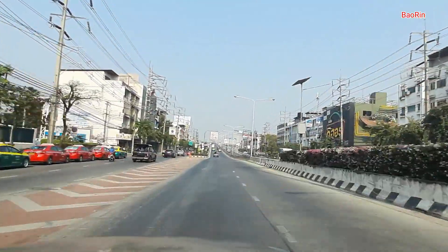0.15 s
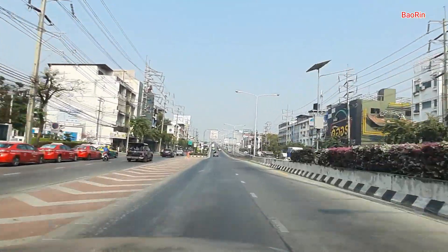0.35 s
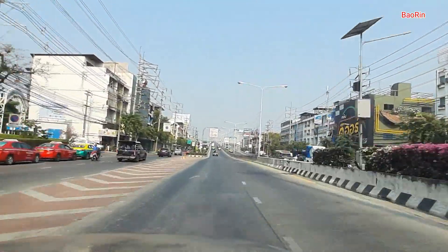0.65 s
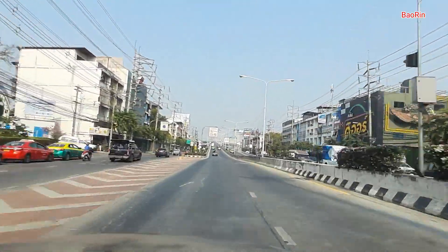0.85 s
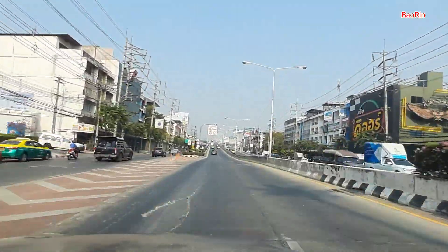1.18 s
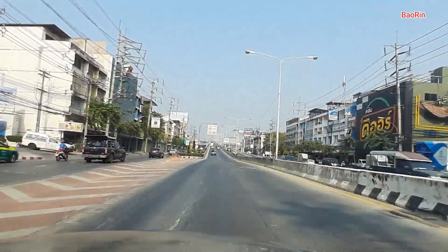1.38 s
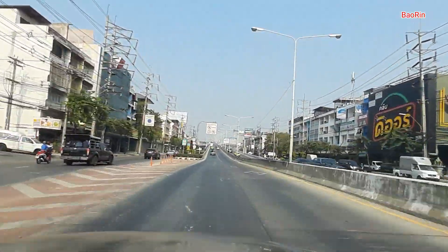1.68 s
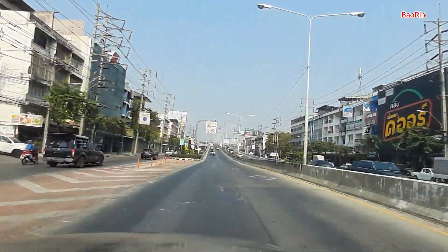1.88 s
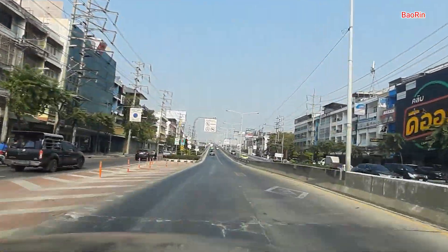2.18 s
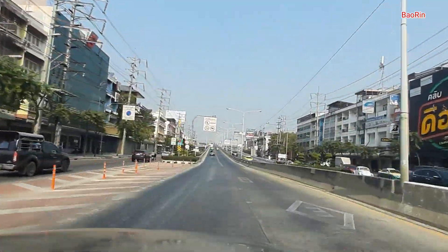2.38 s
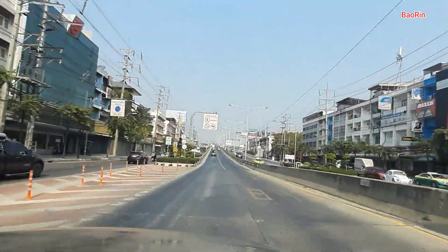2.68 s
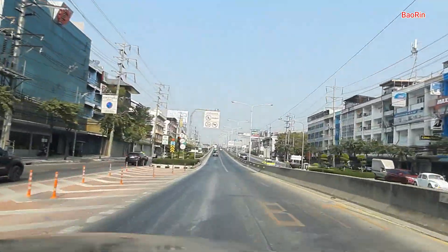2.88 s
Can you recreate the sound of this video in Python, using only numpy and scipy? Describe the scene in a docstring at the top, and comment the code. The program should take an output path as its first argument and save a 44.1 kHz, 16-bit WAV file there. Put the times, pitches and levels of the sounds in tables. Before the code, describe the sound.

Tyres and engine rumble inside a moving car as seams thud and loose plastic rattles

```python
"""Inside a car on a worn concrete road: three seconds of filtered noise, sine waves and short blows.
From the start the engine drones (sines), the tyres roar (noise), trim ticks and chatters, and seams knock.
At about 1.5 s a short uneven stretch swells the rumble and the cabin booms; soon a small hard part clinks.
From about 2.3 s a longer uneven stretch brings more rumble, booms, knocks and rattling trim.
It eases towards the end, where the small part clinks once more."""
import sys
import numpy as np
from scipy import signal
from scipy.fft import rfft, irfft, next_fast_len
from scipy.io import wavfile

SR = 44100
rng = np.random.default_rng(int(sys.argv[2]) if len(sys.argv) > 2 else 0)


def generate_wav(sig):
    """Save sig (samples, or channels by samples) to the path in sys.argv[1] as 16-bit PCM at SR."""
    pcm = np.round(np.clip(np.atleast_2d(sig).T, -1, 1) * 32767).astype(np.int16)
    wavfile.write(sys.argv[1], SR, pcm)


N = 134505
T = np.arange(N) / SR  # time of each sample, s

# Engine: average firing rate, its relative wander, and the waver of each line
FIRING_HZ, SPEED_WANDER, ENGINE_WAVER_DB = 71.32, 0.0061, 0.5
# engine lines: multiple of the firing rate, level/dB
ENGINE_LINES = [(1, -2), (2, -10), (3, -32), (4, -23.5)]
# strength of the drone: t/s, level/dB
DRONE_LEVEL = [(0, -60), (.13, -27), (.37, -33.5), (.45, -26.5), (.6, -30), (.82, -33), (1.0, -35),
               (1.15, -29), (1.38, -26.5), (1.46, -35), (1.58, -31), (1.63, -25.5), (1.68, -30),
               (1.8, -31.5), (1.88, -30), (2.06, -34), (2.3, -32), (2.92, -47.5), (3.05, -28)]

# deep shake of the body on its springs: t/s, level/dB; then its colour: f/Hz, level/dB
SHAKE_LEVEL = [(0, -46), (.15, -39.5), (.6, -48), (1.08, -53), (1.36, -42.5), (1.8, -42), (2.27, -60.5),
               (2.66, -32), (2.85, -42), (3.05, -48)]
SHAKE_COLOUR = [(15, -34), (26, -14), (34, 3.5), (46, -2.5), (70, -19.5), (300, -78), (2000, -120)]

# colour of the steady tyre roar heard through the body: f/Hz, level/dB
ROAR_COLOUR = [(18, -32), (35, -15), (54, 2), (90, 4), (170, 0.5), (225, -10.5), (380, -14.5), (480, -12.5),
               (600, -16.5), (800, -21.5), (980, -19.5), (1080, -22), (1430, -41), (1800, -36.5),
               (2400, -51.5), (4200, -53), (5400, -65.5), (6200, -69), (7700, -70.5), (8400, -72.5),
               (11000, -67.5), (13000, -80.5)]
ROAR_DB, ROAR_FLUTTER_DB = -34, 2.5
# body panels and tread band ringing: f/Hz, width/Hz, level/dB
ROAD_RESONANCES = [(57.5, 11, -42), (142.4, 16, -43.5), (248.8, 2, -49), (266.6, 7.6, -49), (319.2, 6, -51),
                   (338.1, 11, -50.5), (409.5, 5.8, -48), (447.8, 22, -47), (774.5, 22, -56.5),
                   (873.4, 17, -54.5), (947, 7.6, -55.5), (1282, 13, -65.5), (1355, 63, -58.5)]
RING_SWAY_DB, RING_SWAY_HZ = 1.9, 1.93
# hum of the air inside the tyres: t/s, level/dB
TYRE_AIR_LEVEL = [(0, -47), (.2, -37), (.45, -41), (.65, -43.5), (1.3, -45), (1.6, -36.5), (2.0, -44.5),
                  (2.3, -47.5), (2.55, -34.5), (2.9, -39), (3.05, -44)]
TYRE_AIR_HZ, TYRE_AIR_WIDTH_HZ = 194.3, 7.8
# hiss of the tread: t/s, level/dB; then its colour: f/Hz, level/dB
TREAD_LEVEL = [(0, -45.5), (.33, -51.5), (.4, -61), (.47, -52), (.54, -43), (.6, -52), (.7, -47),
               (.9, -48.5), (1.2, -48.5), (1.33, -49), (1.7, -51.5), (1.95, -50.5), (2.05, -47),
               (2.35, -46), (2.52, -48.5), (2.64, -51), (2.74, -50), (2.94, -49.5), (3.05, -91)]
TREAD_COLOUR = [(300, -15), (650, 6.5), (900, 9), (1150, 2), (1400, -4.5), (1850, -15.5), (2400, -24),
                (3200, -39), (12000, -76)]
# brighter hiss of the tread: t/s, level/dB; then its colour: f/Hz, level/dB
SIZZLE_LEVEL = [(0, -64), (.3, -57), (.42, -53), (.66, -51.5), (.85, -63), (1.0, -61), (1.2, -53.5),
                (1.4, -69), (1.97, -61), (2.03, -55), (2.1, -67), (2.45, -66), (2.66, -48), (2.75, -51),
                (3.05, -61)]
SIZZLE_COLOUR = [(600, -25.5), (1050, -4), (1380, 5.5), (1550, -5), (1850, -10.5), (2400, -27),
                 (6000, -62.5)]
# extra rumble on uneven road: t/s, level/dB; then its colour: f/Hz, level/dB
RUMBLE_LEVEL = [(0, -37), (.55, -38.5), (.85, -60), (1.45, -36), (1.505, -26), (1.56, -39), (1.75, -33),
                (1.85, -45.5), (2.3, -38), (2.41, -27), (2.47, -27.5), (2.57, -21.5), (2.66, -27),
                (2.84, -30), (2.98, -43.5), (3.05, -59)]
RUMBLE_COLOUR = [(18, -29), (32, -2.5), (60, 4.5), (105, 5.5), (185, 1.5), (280, -4.5), (350, -8.5),
                 (510, -8), (620, -14), (900, -22.5), (1500, -31), (2400, -49), (6000, -74.5),
                 (14000, -110)]

# chatter of loose trim: t/s, level/dB
CHATTER_LEVEL = [(0, -67.5), (.2, -72), (.48, -74), (.55, -70.5), (.85, -76), (1.2, -74), (1.33, -68.5),
                 (1.44, -73), (1.56, -61.5), (1.66, -71.5), (1.82, -69.5), (1.9, -78), (2.35, -75),
                 (2.49, -57.5), (2.555, -61), (2.61, -54), (2.69, -57), (2.75, -61), (2.83, -60.5),
                 (2.9, -67.5), (3.0, -76), (3.05, -60.5)]
CHATTER_PER_S, CHATTER_SPREAD_DB, CHATTER_T60_S = 1000, 3, 0.045
# broad colour of the plastic trim: f/Hz, level/dB
TRIM_COLOUR = [(1200, -25), (2100, -2), (2600, -4.5), (3200, 3), (4000, 0), (5500, -3), (6500, -11),
               (7700, -10), (8400, -13), (11300, -16), (12800, -27), (16000, -43.5)]
# the trim's own resonances: f/Hz, width/Hz, level/dB relative to the broad colour
TRIM_MODES = [(3110, 64, -11), (3610, 16, -27.5), (3550, 23, -27.5), (3820, 22, -20.5), (4070, 65, -13),
              (4740, 33, -13.5), (4800, 15, -27.5), (5050, 25, -21.5), (5340, 19, -18.5), (5880, 15, -18.5),
              (6100, 15, -22.5)]

# fine gritty rattle: t/s, level/dB; then its colour: f/Hz, level/dB
GRIT_LEVEL = [(0, -84), (.1, -82), (.2, -85.5), (1.25, -86), (1.33, -85), (1.41, -91), (1.49, -69),
              (1.57, -80), (1.64, -83.5), (2.32, -90), (2.42, -78), (2.5, -66.5), (2.56, -66),
              (2.63, -62.5), (2.72, -68), (2.87, -78), (3.0, -78)]
GRIT_COLOUR = [(2000, -15.5), (3300, -1.5), (5500, 4.5), (7600, 4), (8800, -12), (11500, -10), (13500, -21),
               (16000, -30.5)]
GRIT_PER_S, GRIT_SPREAD_DB, GRIT_T60_S = 330, 3.2, .011

# loose trim ticks: t/s, crack level/dB, ring level/dB, ring f/Hz, ring width/Hz
TICKS = [(.006, -62, -73, 4500, 1100), (.044, -71, -73, 5000, 1100), (.084, -66, -67, 3770, 600),
         (0.113, -62, -61.5, 3220, 407), (0.355, -57, -58.5, 4240, 1400), (0.636, -54, -57.5, 4160, 1100),
         (.644, -62, -60.5, 5130, 1100), (.668, -70, -67, 3800, 900), (.682, -72, -66, 4420, 900),
         (.995, -56, -65, 4430, 900), (1.231, -66, -60, 3660, 248), (1.322, -70, -76, 5600, 1400),
         (1.536, -62, -59, 4700, 900), (1.574, -57, -56.5, 4150, 890), (1.663, -77, -75.5, 11500, 1100),
         (1.711, -59.5, -61.5, 3720, 250), (2.286, -64, -75, 7000, 1100), (2.417, -69, -65, 4500, 1100),
         (2.473, -54, -53.5, 4000, 1100), (2.488, -53, -59, 6270, 1400), (2.583, -59, -57, 4700, 1100),
         (2.632, -53, -58, 3600, 1100), (2.661, -58, -64, 3270, 1100), (2.678, -60, -61, 4670, 1100),
         (2.689, -64, -72, 11000, 1400), (2.772, -50, -63, 4400, 1400), (2.811, -48.5, -56, 5570, 1400)]
# colour of the crack: f/Hz, level/dB
TICK_COLOUR = [(1200, -3), (2600, -0.5), (3300, -2.5), (5500, -7), (7500, -6.5), (8500, -10.5),
               (11000, -14), (13000, -23.5), (16000, -32)]
TICK_ATTACK_S, TICK_T60_S, TICK_RING_T60_S = 0.0007, 0.04, 0.13

# a wheel hits a seam: t/s, thud level/dB, thud f/Hz, tread slap level/dB
SEAMS = [(0.018, -33.5, 260, -46), (.125, -36, 160, -45.5), (0.355, -36, 350, -32.5),
         (0.523, -31, 220, -44.5), (0.63, -45, 300, -47), (1.477, -28.5, 171, -45), (1.496, -21, 290, -48),
         (1.675, -29.5, 364, -60), (2.177, -24.5, 196, -43), (2.341, -30.5, 390, -59),
         (2.412, -38, 400, -51), (2.492, -27, 200, -39), (2.528, -27.5, 286, -57), (2.583, -23.5, 259, -37),
         (2.62, -31.5, 750, -46), (2.656, -32, 400, -39.5), (2.715, -29, 344, -48), (2.769, -43, 380, -43)]
# colour of a thud: multiple of its pitch, level/dB
THUD_SHAPE = [(.2, -17), (.6, -7), (1, 5), (1.35, -4.5), (2.2, -25.5), (5, -40), (30, -100)]
# colour of the tread's slap: f/Hz, level/dB
SLAP_COLOUR = [(200, -2), (500, 4.5), (750, -2.5), (1000, 0), (1350, -5.5), (1900, -16), (2600, -34),
               (6000, -55.5), (14000, -90.5)]
SEAM_ATTACK_S, THUD_T60_S, SLAP_T60_S = .009, 0.11, 0.24

# the body heaves and the cabin booms: crest t/s, level/dB, half length/s, f/Hz
BOOMS = [(1.508, -24, 0.012, 113), (1.534, -24.5, 0.014, 61), (1.705, -28, .022, 102.5),
         (1.727, -23, 0.022, 66), (2.391, -29, 0.017, 116), (2.437, -19, 0.011, 79), (2.54, -21, 0.026, 72),
         (2.595, -22.5, 0.0098, 90), (2.767, -21.5, .016, 72), (2.823, -21, 0.018, 75.6)]

# a small hard part clinks: t/s, level/dB
CLINKS = [(1.758, -57), (3.022, -60)]
# how that part rings: f/Hz, level/dB relative to the clink, time to fall by 60 dB/s
CLINK_MODES = [(2920, -2.5, 0.055), (3300, 1.5, 0.024), (3600, -12, .05)]

HISS_DB, CUTOFF_HZ, FADE_S = -83, 15450, .004


def from_db(db):
    """Turn decibels into a plain multiplier."""
    return 10 ** (np.asarray(db) / 20)


def rms_one(x):
    """Scale a sound to an average power of one."""
    return x / np.sqrt(np.mean(x ** 2) + 1e-20)


def level(curve):
    """Multiplier over time, from rows of t/s, level/dB."""
    return from_db(np.interp(T, *np.transpose(curve)))


def noise(colour):
    """Noise of unit power, its frequencies weighted by rows of f/Hz, level/dB."""
    hz, db = np.transpose(colour)
    size = next_fast_len(N)
    f = np.maximum(np.fft.rfftfreq(size, 1 / SR), 1)
    gain = from_db(np.interp(np.log(f), np.log(hz), db))
    white = rng.standard_normal(size)
    return rms_one(irfft(rfft(white) * gain, size)[:N])


def drift(rate):
    """Random wander of spread 1, with changes mostly slower than rate (Hz)."""
    step = 40  # make one wander value for every 40 samples, then join them up
    r = np.exp(-2 * np.pi * rate * step / SR)
    steps = rng.standard_normal(N // step + 2002)
    slow = signal.lfilter([1], [1, -2 * r, r * r], steps)[2000:]  # drop the filter's start-up
    return np.interp(np.arange(N) / step, np.arange(len(slow)), rms_one(slow - slow.mean()))


def resonance(hz, width):
    """Noise of unit power ringing at one pitch; a smaller width rings longer."""
    r = np.exp(-np.pi * width / SR)
    poles = [1, -2 * r * np.cos(2 * np.pi * hz / SR), r * r]
    rung = signal.lfilter([1, 0, -1], poles, rng.standard_normal(N + SR))
    # keep about half an octave either side of the pitch
    skirts = signal.butter(2, [hz / np.sqrt(2), hz * np.sqrt(2)], "band", fs=SR, output="sos")
    return rms_one(signal.sosfilt(skirts, rung)[SR:])  # drop the first second of settling


def blow(start, attack, t60):
    """Loudness of a blow: a quick rise, then a fall of 60 dB in every t60 seconds."""
    rise = np.clip((T - start) / attack, 0, 1)
    fall = 1e3 ** (-np.clip((T - start - attack) / t60, 0, 4))
    return rise * fall


def patter(per_s, spread_db, t60):
    """Loudness of many tiny random contacts of uneven size, each dying away; unit power."""
    sizes = from_db(spread_db * np.minimum(rng.exponential(1, N), 4))
    contacts = (rng.random(N) < per_s / SR) * sizes
    keep = np.exp(-2 * np.log(1000) / (t60 * SR))  # share of energy left after one sample
    energy = signal.lfilter([1], [1, -keep], contacts ** 2 + 1e-18)
    return rms_one(np.sqrt(energy))


def engine_turns():
    """Count of firing cycles so far, as the engine's speed wanders a little."""
    firing_hz = FIRING_HZ * (1 + SPEED_WANDER * drift(1.32))
    return np.cumsum(firing_hz) / SR + rng.random()


def engine(turns):
    """Drone of sine waves at whole multiples of the firing rate, each wavering a little."""
    lines = 0
    for multiple, db in ENGINE_LINES:
        strength = from_db(db + ENGINE_WAVER_DB * drift(5.8))
        lines = lines + strength * np.sin(2 * np.pi * round(multiple) * turns)
    return np.sqrt(2) * level(DRONE_LEVEL) * lines


def shake():
    """Deep noise of the body shaking on its springs."""
    return level(SHAKE_LEVEL) * noise(SHAKE_COLOUR)


def tyres():
    """Fluttering roar, swaying resonances, air hum and tread hiss, with rumble on uneven road."""
    roar = from_db(ROAR_DB + ROAR_FLUTTER_DB * drift(14)) * noise(ROAR_COLOUR)
    rings = 0
    for hz, width, db in ROAD_RESONANCES:
        strength = from_db(db + RING_SWAY_DB * drift(RING_SWAY_HZ))
        rings = rings + strength * resonance(hz, width)
    air_hum = level(TYRE_AIR_LEVEL) * resonance(TYRE_AIR_HZ, TYRE_AIR_WIDTH_HZ)
    tread = level(TREAD_LEVEL) * noise(TREAD_COLOUR)
    sizzle = level(SIZZLE_LEVEL) * noise(SIZZLE_COLOUR)
    rumble = level(RUMBLE_LEVEL) * noise(RUMBLE_COLOUR)
    return roar + rings + air_hum + tread + sizzle + rumble


def trim_noise():
    """Noise of unit power coloured like the plastic trim, with its own resonances."""
    modes = sum(from_db(db) * resonance(hz, width) for hz, width, db in TRIM_MODES)
    return rms_one(noise(TRIM_COLOUR) + modes)


def chatter():
    """Loose trim buzzes: a dense patter of contacts shapes the trim's noise."""
    contacts = patter(CHATTER_PER_S, CHATTER_SPREAD_DB, CHATTER_T60_S)
    return level(CHATTER_LEVEL) * contacts * trim_noise()


def grit():
    """Bright, very short grains of noise, strongest on the roughest patches."""
    return level(GRIT_LEVEL) * patter(GRIT_PER_S, GRIT_SPREAD_DB, GRIT_T60_S) * noise(GRIT_COLOUR)


def ticks():
    """Plastic contacts: a short broad crack, while the touched piece rings at its own pitch."""
    crack = noise(TICK_COLOUR)
    total = 0
    for start, crack_db, ring_db, hz, width in TICKS:
        total = total + from_db(crack_db) * crack * blow(start, TICK_ATTACK_S, TICK_T60_S)
        ring = resonance(hz, width) * blow(start, TICK_ATTACK_S, TICK_RING_T60_S)
        total = total + from_db(ring_db) * ring
    return total


def seams():
    """Each seam gives a noisy thud through the suspension and a slap of the tread."""
    slap = noise(SLAP_COLOUR)
    total = 0
    for start, thud_db, hz, slap_db in SEAMS:
        thud = noise([(multiple * hz, db) for multiple, db in THUD_SHAPE])
        total = total + from_db(thud_db) * thud * blow(start, SEAM_ATTACK_S, THUD_T60_S)
        total = total + from_db(slap_db) * slap * blow(start, SEAM_ATTACK_S, SLAP_T60_S)
    return total


def booms(turns):
    """Each heave briefly swells a low tone of the cabin air, in step with the drone at its crest."""
    total = 0
    for crest, db, half_length, hz in BOOMS:
        swell = np.exp(-.5 * ((T - crest) / half_length) ** 2)
        cycles = turns + (hz - FIRING_HZ) * (T - crest)
        total = total + from_db(db) * swell * np.sin(2 * np.pi * cycles)
    return np.sqrt(2) * total


def clinks():
    """A small hard part rings briefly as a few fading sine waves."""
    total = 0
    for start, db in CLINKS:
        for hz, mode_db, t60 in CLINK_MODES:
            tone = np.sin(2 * np.pi * hz * (T - start))
            total = total + from_db(db + mode_db) * blow(start, TICK_ATTACK_S, t60) * tone
    return total


def scene():
    """All the sounds in the cabin added together, as one channel."""
    turns = engine_turns()
    car = engine(turns) + shake() + tyres() + booms(turns)
    knocks = chatter() + grit() + ticks() + seams() + clinks()
    return (car + knocks)[None]


def record(dry):
    """Add faint microphone hiss, soften both ends and cut the very top steeply."""
    hissy = dry + from_db(HISS_DB) * rng.standard_normal(N)
    fade = np.minimum(np.minimum(T, T[::-1]) / FADE_S, 1)
    top_cut = signal.ellip(10, .1, 80, CUTOFF_HZ, fs=SR, output="sos")
    return signal.sosfilt(top_cut, hissy * fade)


dry = scene()
out = record(dry)
generate_wav(out)
```